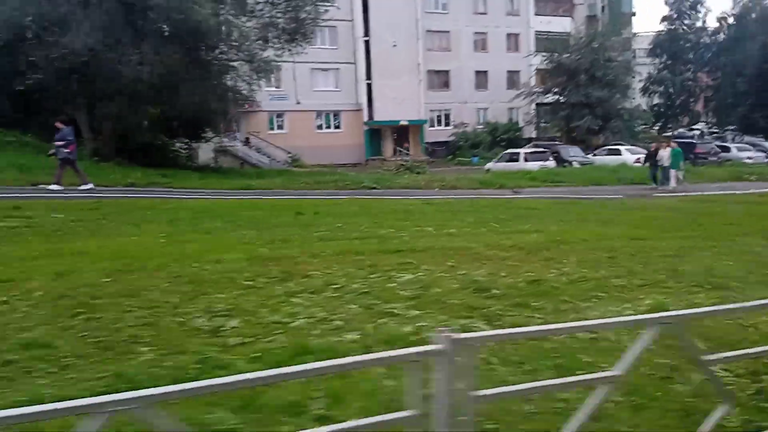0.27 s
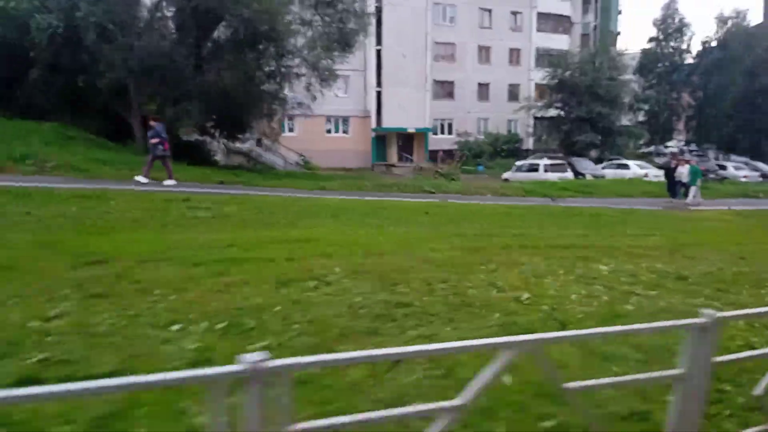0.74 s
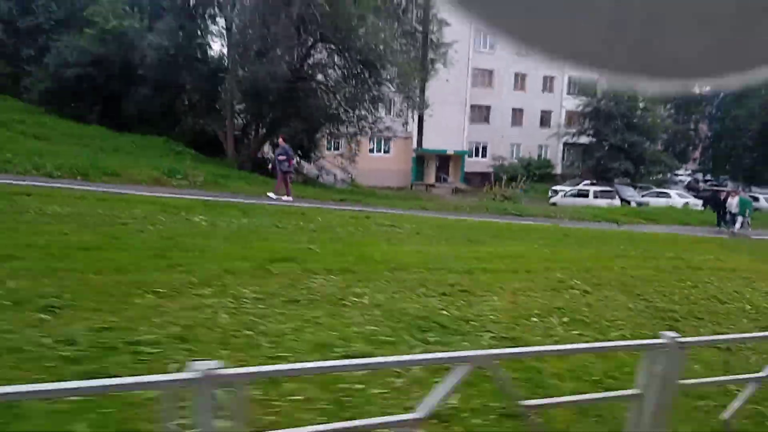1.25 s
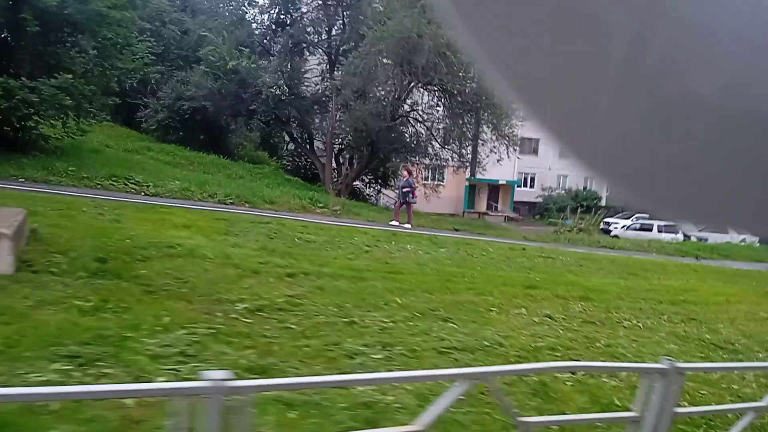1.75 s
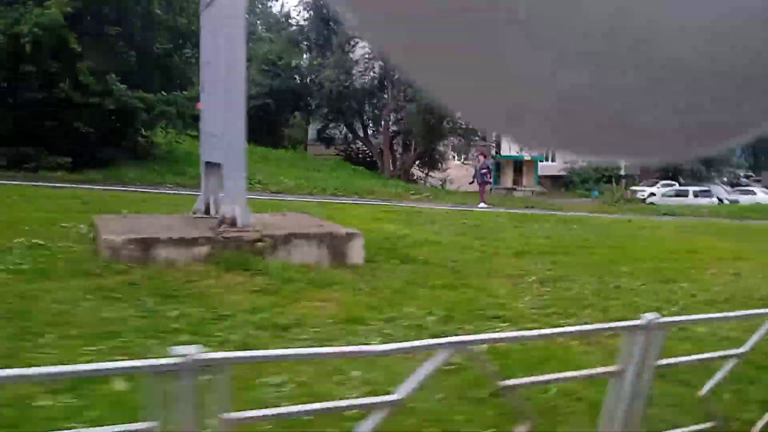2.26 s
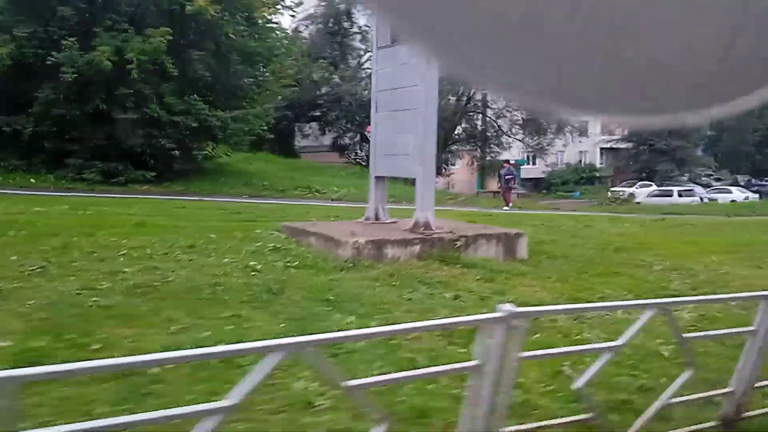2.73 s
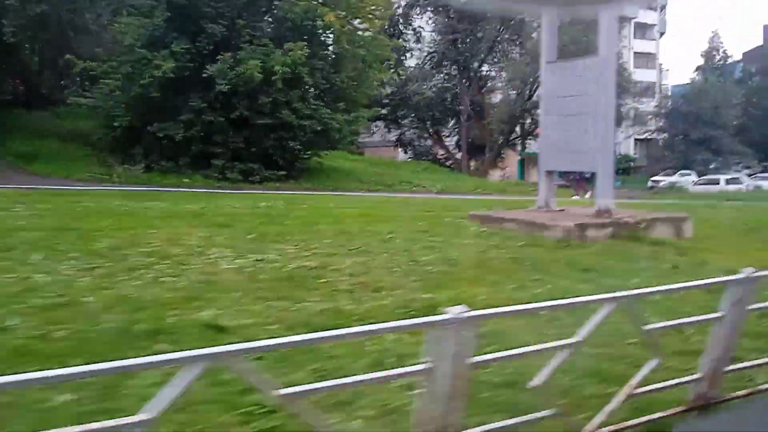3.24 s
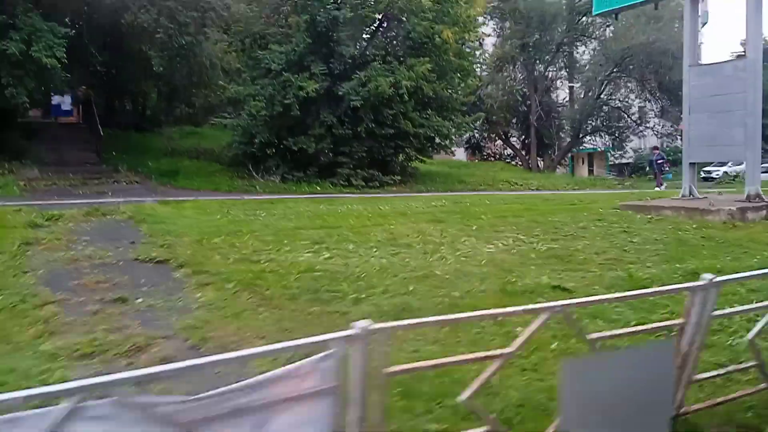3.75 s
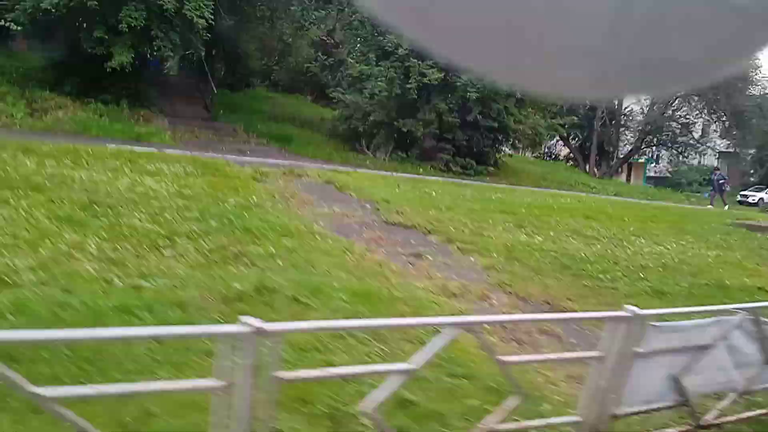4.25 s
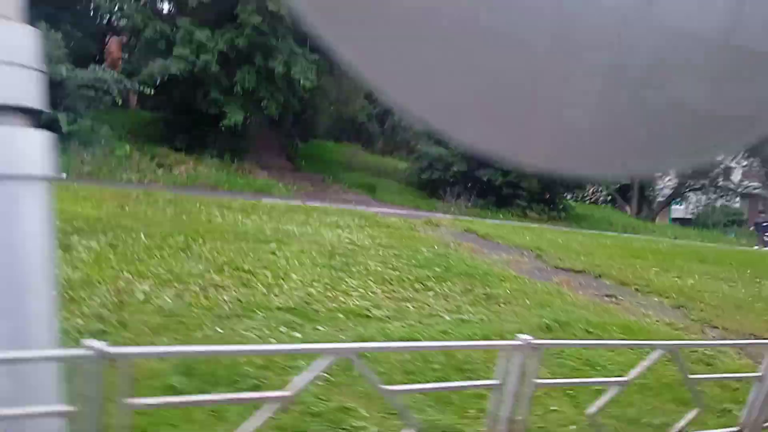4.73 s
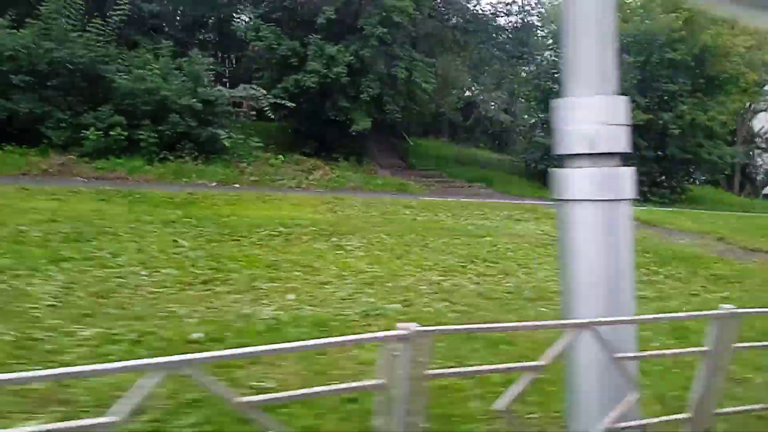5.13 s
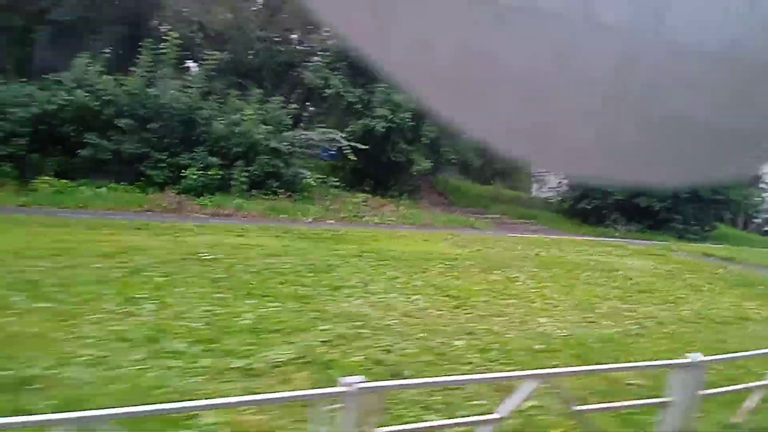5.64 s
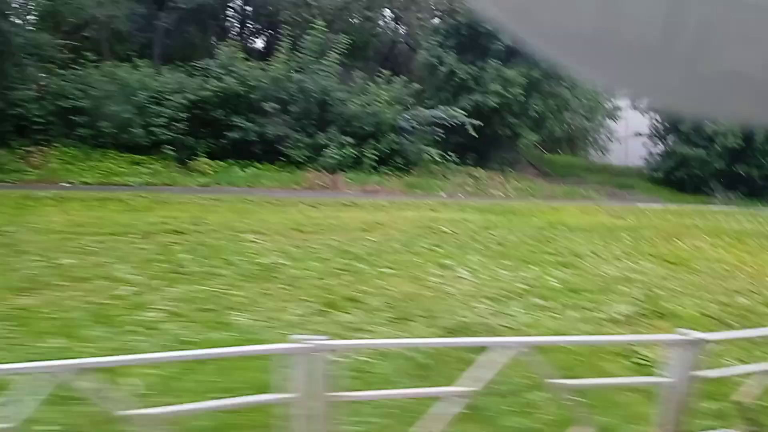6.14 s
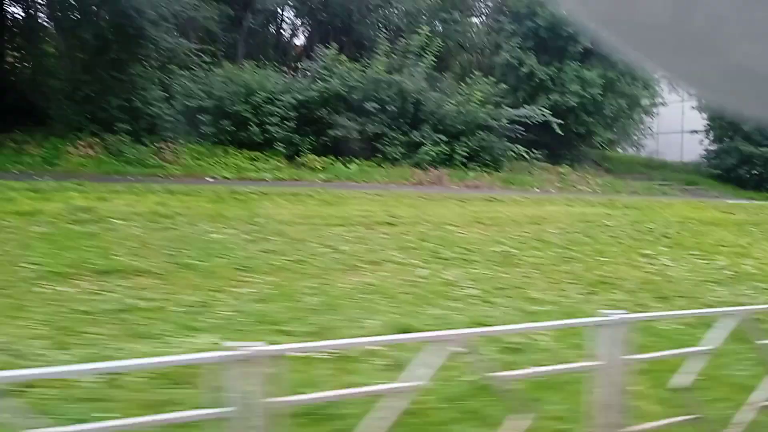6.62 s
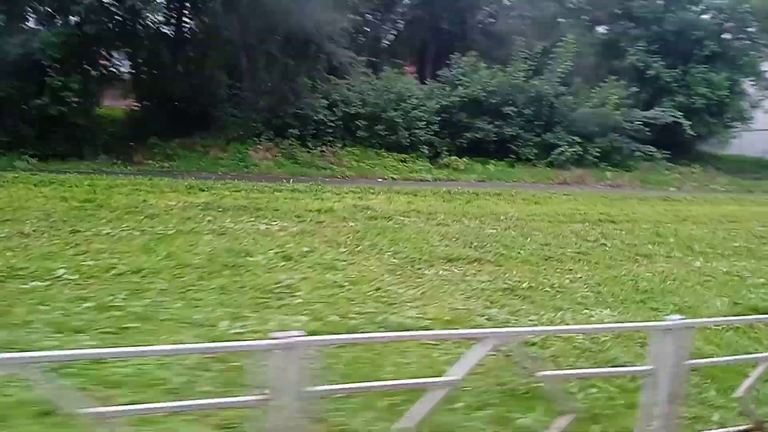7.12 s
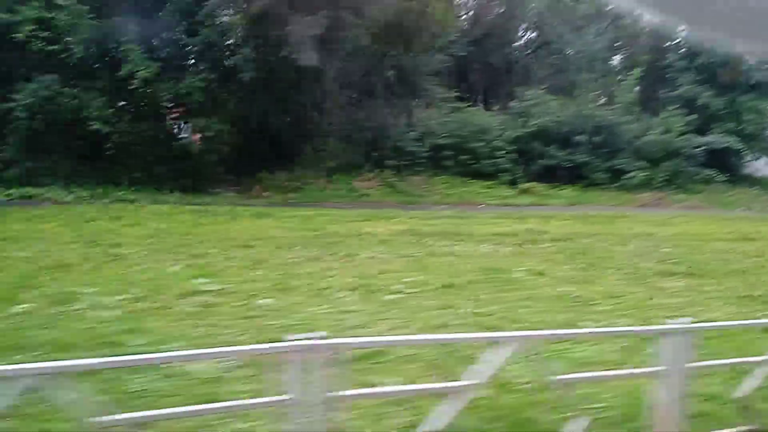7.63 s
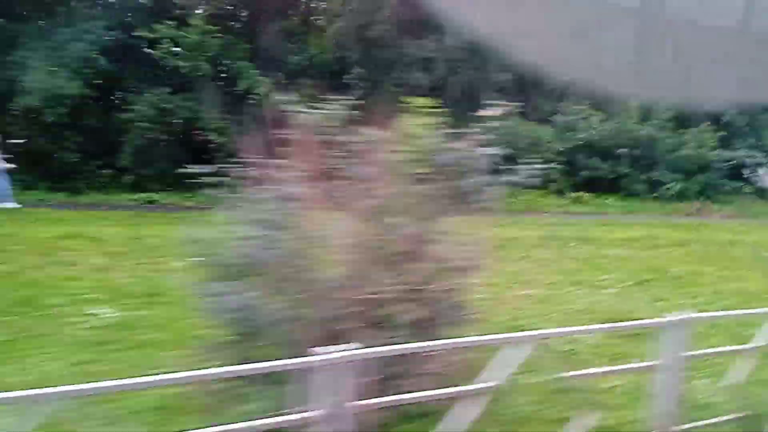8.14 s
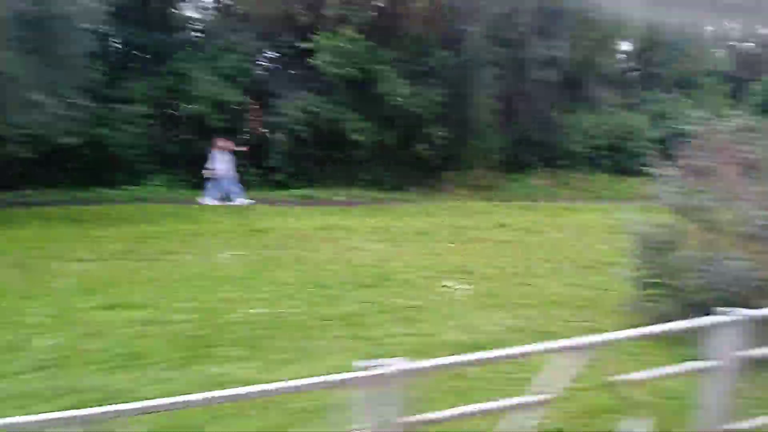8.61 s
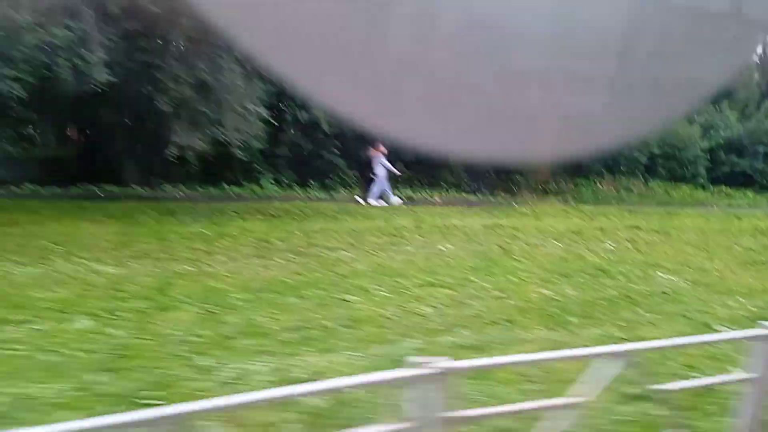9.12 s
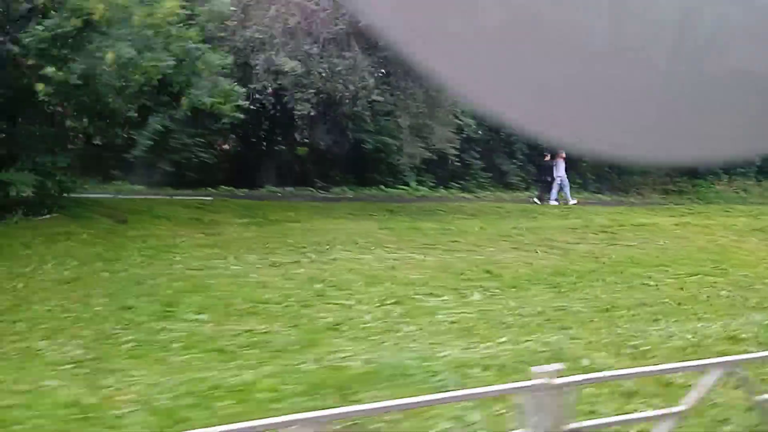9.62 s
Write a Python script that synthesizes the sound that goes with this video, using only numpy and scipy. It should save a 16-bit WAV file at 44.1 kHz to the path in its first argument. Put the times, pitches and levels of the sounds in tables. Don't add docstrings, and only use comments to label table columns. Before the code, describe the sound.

Loud bus engine drone climbs, falls away during a gear change, then labours upward again over road rumble, seat knocks and ticking trim.

```python
import sys
import numpy as np
from scipy import signal
from scipy.fft import rfft, irfft, next_fast_len
from scipy.io import wavfile
from scipy.ndimage import uniform_filter1d, map_coordinates

SR = 44100
rng = np.random.default_rng(int(sys.argv[2]) if len(sys.argv) > 2 else 0)


def wrap_up_sound(samples):
    columns = np.atleast_2d(samples).T
    tamed = np.clip(columns, -1, 1)
    steps = np.round(tamed * 32767).astype(np.int16)
    wavfile.write(sys.argv[1], SR, steps)


def amplitude_ratio(level_db):
    exponent = np.asarray(level_db, float) / 20
    return 10 ** exponent


N = 435266

# time in seconds, firing rate in Hz, throttle from 0 to 1, shake of the shell in dB.
DRIVE = [(0, 162, 0.9, -1), (.5, 168.3, 0.93, -0.5), (1.25, 178.3, 0.88, 0.5), (1.52, 179.8, 0.44, 0.5),
         (1.75, 165.4, 0, -2), (2.05, 144.9, 0.5, -3.5), (2.45, 127, 0, -7.5), (2.75, 109.1, 0, -9),
         (3.1, 92.7, 0, -12), (3.42, 83.2, 0, -11), (3.52, 84.5, 1, -8.5), (4.0, 88.38, 0.99, -8.5),
         (5.4, 94.15, 0.82, -8), (6.2, 96.68, 1, -7.5), (7.2, 99.18, 1, -7.5), (8.2, 103.5, 0.95, -6.5),
         (8.8, 106.8, 0.99, -6.5), (9.87, 109.7, 1, -6)]


def walk(rate):
    knots = rng.standard_normal(int(N / SR * rate) + 2)
    coarse = map_coordinates(knots, [np.arange(0, len(knots) - 1, 1 / 8)], order=3)
    return np.interp(np.arange(N) * (8 * rate / SR), np.arange(len(coarse)), coarse)


def curves(table):
    s, *columns = np.transpose(table)
    return [np.interp(np.arange(N) / SR, s, c) for c in columns]


def add(out, s, grain):
    i = int(s * SR)
    out[i:i + len(grain)] += grain[:len(out) - i]


def shape(points, size=N):
    hz, db = np.transpose(points)
    return np.interp(np.log(np.fft.rfftfreq(size, 1 / SR) + 1), np.log(hz), db)


def sweep(hz, modes):
    power = sum(amplitude_ratio(db) ** 2 / (1 + (2 * (hz - centre) / width) ** 2) ** 2 for centre, width, db in modes)
    return 10 * np.log10(power)


def engine():
    # multiple of the full engine cycle, dB at low revs, dB at high revs.
    uneven_orders = [(4, -8, 3), (5, -10, -2), (7, -8, -8), (9, -3, -8), (10, 1, -6), (11, -8, -5),
                     (13, -8, -4), (14, 1, -8), (16, -2, -6), (18, -6, -8), (20, -4, -6), (21, -7, -8),
                     (24, -9, -9), (27, -14, -12)]
    # Hz, width in Hz, tone level in dB at the centre.
    boom_modes = [(93.6, 5.9, -38), (98, 11, -48.5), (106.8, 6.9, -37), (164.5, 16.7, -21.5),
                  (179.3, 14, -29)]
    # Hz, width in Hz, dB.
    timing_modes = [(362, 5.1, -37.5), (380, 16.4, -39), (390.5, 8, -43.5), (402.2, 10.3, -39),
                    (413.1, 10, -48), (449.1, 22.5, -38.5), (461.5, 10, -49.5), (690, 11, -38),
                    (741, 21, -34), (754, 16, -42)]
    # Hz, width in Hz, dB.
    gearbox_modes = [(352, 24.7, -38), (372, 10, -36.5), (387, 7.5, -39)]
    # Hz, width in Hz, dB.
    upper_modes = [(432, 10, -46), (454.4, 12, -43.5), (466, 11, -41.5), (495, 8.8, -42), (512, 12, -43.5),
                   (528, 12, -39.5), (562, 13, -46.5), (595, 10, -39.5)]
    # Hz, width in Hz, dB.
    bank_modes = [(155, 65, -46.5), (219, 19, -32.5), (250, 30, -54)]
    upper_orders = (21, 24, 27)
    timing_order, gearbox_order = 34, 28.2

    hz, throttle, _ = curves(DRIVE)
    t, shut = np.arange(N) / SR, 1 - np.clip(throttle, 0, 1)
    cycle = 2 * np.pi * np.cumsum(hz) / SR / 8
    revs = np.clip((hz - 105) / 55, 0, 1)

    beat_db = 4.5 * np.cos(2 * np.pi * 7.2 * (t - 0.356))
    beat_db *= np.exp(-((t - 0.4) / 0.35) ** 2) * np.clip((t - 0.19) / 0.06, 0, 1)

    boom_db = sweep(hz, boom_modes) - 14.5 * shut + beat_db
    uneven_db = -47.5 - 12 * shut
    timing_shut_db = -26.5 * shut
    timing_db = sweep(hz * timing_order / 8, timing_modes) + timing_shut_db
    gearbox_db = sweep(hz * gearbox_order / 8, gearbox_modes)
    gearbox_db += np.interp(t, [6.05, 6.05 + 0.11], [-28.5, 0])

    def tone(order, db, waver_db=1.5, wander=0.3):
        level = np.sqrt(2) * amplitude_ratio(db + waver_db * walk(7))
        return level * np.sin(order * cycle + wander * walk(9) + 7 * rng.random())

    out = tone(8, boom_db, waver_db=1.2, wander=0.25)
    for order, low_db, high_db in uneven_orders:
        out += tone(order, uneven_db + low_db + revs * (high_db - low_db))
    out += tone(timing_order, timing_db, waver_db=2.6, wander=0.5)
    out += tone(2 * timing_order, timing_db - 13.5 - 8 * (1 - revs))
    out += tone(gearbox_order, gearbox_db, waver_db=4, wander=0.9)
    for order in upper_orders:
        out += tone(order, sweep(hz * order / 8, upper_modes) + timing_shut_db, waver_db=2.5)
    out += tone(12, sweep(hz * 12 / 8, bank_modes))
    return out, cycle * 8


def shake():
    shares = (0.33, 0.51, 1.01, 1.02)
    # time in seconds, rise of the rumble in dB.
    joints = [
        (0, 4),
        (1.54, 0),
        (2.75, -2.5),
        (3.7, 0),
        (4.78, 6.5),
        (5.28, 4),
        (5.75, 4),
        (6.7, 7),
        (7.5, 5.5),
        (8.9, 2),
    ]
    # time in seconds, half length in seconds, rise in dB.
    patches = [
        (1.6, .1, 1),
        (3.75, 0.11, 0.5),
        (4.25, 0.074, 2.5),
        (4.75, 0.091, 1),
        (5.35, .1, 1),
        (6.7, .15, 0),
        (7.5, .1, 1),
        (8.798, .12, 2.5),
        (9.05, .08, 0.5),
        (9.6, .15, 0.5),
    ]
    t, shake_db = np.arange(N) / SR, curves(DRIVE)[-1]
    levels = np.outer(shares, shake_db - np.median(shake_db))
    thumps_db = sum(db * np.exp(-((t - s) / 0.1) ** 2) for s, db in joints)
    levels[0] += thumps_db - 1.5
    levels[1:3] += 0.1 * thumps_db
    levels[2] += sum(db * np.exp(-((t - s) / half) ** 2) for s, half, db in patches)
    return levels


def rings(f, width_hz=22, depth_db=1.0):
    ripple = np.interp(f / width_hz, np.arange(1200), rng.standard_normal(1200))
    return depth_db * ripple * np.clip(np.minimum(6000 / f, f / 900), 0, 1)


def body(firing, gate=0.08):
    # Hz, dB per Hz.
    spectrum = [(20, -28.5), (50, -12), (86, -7.5), (174, .5), (315, -7.5), (447, -9), (707, -16),
                (850, -18.5), (1150, -23), (1550, -27.5), (2020, -26.5), (3560, -42.5), (6810, -49),
                (16000, -44.5)]
    # Hz, width in Hz, dB.
    panels = [(79.6, 8.9, 7), (110, 12, 1), (159, 28, 1.5), (205, 18, 0.5), (263, 30, 2), (350, 40, 0),
              (456, 28, 0.5), (517, 34, 2), (597, 53, 4), (696, 18, 6.5), (815, 40, -1), (980, 80, -0.5),
              (1240, 60, 1.5), (2050, 110, -0.5), (2760, 670, 2), (3226, 85, 4), (6280, 1800, 5)]
    layer_hz = (100, 450, 1700, 5000)
    size = next_fast_len(N)
    f = np.fft.rfftfreq(size, 1 / SR) + 1
    db = shape(spectrum, size=size)
    db += sum(gain / (1 + (2 * (f - hz) / width) ** 2) for hz, width, gain in panels)
    noise = rfft(rng.standard_normal(size)) * amplitude_ratio(db + rings(f))
    noise *= amplitude_ratio(-33) / np.std(irfft(noise, size))

    levels = shake()
    out, swell, rustle = np.zeros(N), walk(3), walk(40)
    for hz in 22 * 2 ** np.arange(0, 10, 0.5):
        window = np.cos(np.pi * np.clip(np.log2(f / hz), -0.5, 0.5)) ** 2
        band = irfft(noise * window, size)[:N]
        share = [np.interp(np.log(hz), np.log(layer_hz), row) for row in np.eye(4)]
        lumpy = np.clip(1900 / hz, 0.2, 1)
        flicker_db = lumpy * (0.5 * swell + 1.37 * walk(16) + 1.23 * walk(7))
        band *= amplitude_ratio(share @ levels + flicker_db + (hz > 9000) * 0.9 * rustle)
        out += band * (1 + gate * min(hz / 2500, 1) * np.cos(firing))
    return out


def singing():
    # start in seconds, length in seconds, pitch in Hz, width in Hz, level in dB.
    songs = [(0.3, 1.8, 459, 10, -45), (0.46, .7, 900, 10, -48.5), (0.05, .7, 1465, 24, -51),
             (1.5, 1.5, 13500, 60, -67), (1.26, .75, 248, 9.9, -38), (1.4, 0.09, 166, 16, -35),
             (4.64, 0.14, 1200, 67, -50.5), (1.5, 0.41, 600, 31, -56.5), (1, 0.24, 1300, 17, -58),
             (1.702, 0.72, 1244, 21, -53), (4, .08, 250, 17, -41), (7.86, 0.083, 215, 19, -39),
             (8, .25, 705, 12, -47), (8.5, .2, 680, 14, -46.5), (8.95, .35, 700, 12, -47),
             (1.7, .3, 600, 25, -45), (1.3, 0.065, 370, 30, -40), (5.38, 0.39, 334, 7, -43),
             (2.8, 3.7, 1246, 15, -56.5), (4.25, .16, 636, 14, -45), (5.6, .35, 2040, 25, -57),
             (5.5, 1.8, 2040, 50, -62.5), (6.496, 0.55, 80, 7.2, -41), (7.5, 0.49, 80, 3.8, -38.5),
             (8, 0.61, 1243, 18, -53.5), (8, 1.4, 909, 6.8, -57), (8, 1.6, 694, 14, -50),
             (8.5, .5, 82.5, 5.3, -40.5), (8.893, 0.88, 749, 6, -52.5), (9.298, 0.94, 927.6, 9.5, -59),
             (9.301, 0.6, 2050, 46, -58)]
    out = np.zeros(N)
    for s, length, hz, width, db in songs:
        t = np.arange(int(min(length, N / SR - s - 0.01) * SR)) / SR
        drive = rng.standard_normal(len(t) + SR // 4)
        ring = signal.lfilter(*signal.iirpeak(hz, hz / width, SR), drive)[-len(t):]
        swell = np.sin(np.pi * t / length) ** 0.34
        ends = np.clip(np.minimum(t, length - t) / 0.018, 0, 1)
        add(out, s, amplitude_ratio(db) * ring / np.std(ring) * swell * ends)
    return out


def squeaks():
    # start in seconds, length in seconds, pitch in Hz, even and odd partials in dB.
    slips = [(1.524, .02, 2040, -56, -80), (1.563, .04, 2055, -57, -80), (1.592, .024, 2075, -46, -64),
             (1.608, 0.027, 2085, -43, -37), (1.624, 0.032, 2097, -49, -45), (1.644, .03, 2085, -53, -53),
             (1.668, .028, 2075, -58, -70), (2.49, .024, 2045, -57, -94), (2.522, .035, 2060, -55, -89),
             (2.56, .034, 2043, -59, -82), (2.581, 0.11, 2041, -54, -87), (2.686, 0.03, 2050, -57, -52),
             (2.715, .023, 2070, -53, -42), (2.734, .018, 2060, -67, -53), (2.752, 0.03, 2050, -65, -61)]
    partials_db = (-6, 1.5, 1, -3, -9, -13, -22)
    # start in seconds, length in
    # seconds, Hz, dB.
    peeps = [(1.612, 0.034, 2103, -41), (1.62, .022, 10450, -43), (2.645, .02, 8170, -57),
             (2.72, .03, 10350, -56), (2.758, .02, 10350, -60), (5.392, 0.0048, 3590, -49.5),
             (1.524, .075, 8240, -54), (1.593, 0.067, 8280, -43), (1.594, .028, 12500, -49),
             (1.648, .03, 7960, -55), (2.519, 0.044, 8160, -55), (2.56, 0.032, 8170, -52),
             (2.596, .028, 8170, -51), (2.689, 0.011, 2060, -49), (2.718, .019, 2070, -50),
             (2.721, 0.021, 8240, -46), (5.385, .008, 5820, -57), (2.575, .075, 714, -41),
             (4.68, .026, 1190, -43), (5.115, .02, 1240, -46), (5.222, .024, 1200, -44),
             (5.292, .022, 1230, -46), (1.653, 0.011, 6100, -43), (1.666, 0.015, 6060, -40),
             (1.658, .022, 12100, -48), (1.65, .035, 14200, -62), (1.688, 0.026, 6078, -51),
             (1.705, .045, 6100, -61), (2.715, .03, 14450, -60), (2.65, .03, 10800, -66),
             (1.528, .06, 12350, -62), (3.053, 0.024, 5580, -69), (3.16, .022, 5550, -65),
             (3.58, 0.05, 15300, -66), (3.66, 0.059, 15050, -67), (3.71, .08, 13750, -68),
             (3.85, 0.045, 13430, -67), (3.985, .055, 5750, -69.5), (4.04, .06, 14400, -74),
             (4.066, 0.055, 11100, -53), (4.694, .033, 11200, -54), (4.688, .018, 11750, -58),
             (4.781, .011, 10700, -55), (5.307, 0.006, 5950, -55), (5.316, 0.006, 5950, -54),
             (5.389, .009, 8500, -56), (3.113, 0.12, 3950, -74)]
    out, jitter = np.zeros(N), 0.09 * walk(400) + 0.03 * walk(1600)
    flutter_db = [1.6 * walk(120) for _ in partials_db]
    for s, length, hz, even_db, odd_db in slips:
        t = np.arange(int(length * SR)) / SR
        span = slice(int(s * SR), int(s * SR) + len(t))
        phase = 2 * np.pi * hz * t + jitter[span]
        stack = np.zeros(len(t))
        for k, db in enumerate(partials_db):
            level_db = db + (odd_db, even_db)[k % 2] + flutter_db[k][span]
            stack += amplitude_ratio(level_db) * np.sin((k + 1) * phase)
        add(out, s, np.sqrt(2) * stack * np.sin(np.pi * t / length) ** 0.7)
    for s, length, hz, db in peeps:
        t = np.arange(int(length * SR)) / SR
        span = slice(int(s * SR), int(s * SR) + len(t))
        phase = 2 * np.pi * hz * t + min(hz / 1900, 3.2) * jitter[span]
        peep = amplitude_ratio(db + flutter_db[0][span]) * np.sin(phase)
        add(out, s, np.sqrt(2) * peep * np.sin(np.pi * t / length) ** 0.38)
    return out


def thuds():
    # time in seconds, peak in dB, colour in Hz.
    knocks = [(2.251, -27, 592), (2.583, -31, 713), (2.973, -30, 560), (3.207, -32, 708), (3.291, -33, 608),
              (3.473, -37, 606), (4.139, -30, 581), (4.456, -28, 595), (4.846, -30, 603), (5.675, -27, 538),
              (6.598, -32, 563), (9.787, -28, 700)]
    out, t = np.zeros(N), np.arange(SR // 5) / SR
    for s, db, hz in knocks:
        decay = 1000. ** (-t / 0.049)
        add(out, s, amplitude_ratio(db - 0.5) * np.sin(2 * np.pi * hz * t) * decay * np.minimum(t / 0.0014, 1))
    return out


def rattle(grit, hz, t60, sharp=4.5, broad=0.2):
    t = np.arange(len(grit)) / SR
    colour = signal.lfilter(*signal.iirpeak(min(hz, 16000), sharp, SR), grit)
    grain = 1 + np.abs(uniform_filter1d(grit[::-1], size=60)) * 3
    return (colour + broad * grit) * grain * 1000. ** (-t / t60) * np.minimum(t / 0.0005, 1)


def ticks():
    # time in seconds, peak in dB, colour in Hz.
    trim = [(2.688, -54, 5700), (2.705, -55, 5600), (2.692, -56, 12200), (2.56, -59, 12200),
            (2.722, -55, 14300), (2.718, -53, 9500), (2.725, -53.5, 6200), (2.865, -55, 7020),
            (2.905, -60, 7000), (3.031, -54.5, 7300), (3.113, -56, 7240), (3.15, -58, 7298),
            (4.05, -56, 7000), (4.197, -58, 14800), (4.25, -61, 3500), (4.655, -60, 12000),
            (4.69, -49, 15000), (4.762, -49.5, 6140), (4.757, -46, 11200), (4.806, -48, 10300),
            (4.812, -55, 6000), (4.738, -57, 7000), (5.336, -51.5, 15100), (5.39, -51, 15600),
            (4.91, -51, 10500), (4.963, -52.5, 10830), (5.013, -55, 10800), (5.23, -55, 9592),
            (5.484, -53.5, 10500), (5.54, -53, 10800)]
    out = np.zeros(N)
    for s, db, hz in trim:
        t60 = 0.21 * (hz / 7000) ** -1.7
        add(out, s, amplitude_ratio(db) * rattle(rng.standard_normal(SR // 5), hz, t60))
    return out


def latch():
    # time in seconds, peak in dB, brightness in dB per octave.
    knocks = [(4.7533, -37.5, -4), (4.762, -43, -1.5), (4.772, -45, -3.5), (5.297, -50, -9),
              (5.307, -48, 1), (5.336, -49, 0), (5.343, -49, -8), (5.3525, -48, -9), (5.388, -47, 3),
              (5.393, -40, -5), (5.438, -54, -8), (5.451, -49.5, -5)]
    # Hz, dB, t60 in seconds.
    parts = [(1300, -11, 0.04), (1850, -6, .05), (15000, -8, .04), (2320, 0, .05), (3500, 2, 0.06),
             (5860, -3.5, .09), (7200, -7, 0.1), (11500, -6, .05)]
    out = np.zeros(N)
    for s, db, bright_db in knocks:
        grit = rng.standard_normal(SR // 5)
        for hz, part_db, t60 in parts:
            level = amplitude_ratio(db + part_db + bright_db * np.log2(hz / 3500))
            add(out, s, level * rattle(grit, hz, t60, sharp=7.0, broad=0.06))
    return out


def cabin(x, t60=0.15, wet_db=-11):
    t = np.arange(SR // 4) / SR
    tail = rng.standard_normal(len(t)) * 1000. ** (-t / t60) * (t > 0.003)
    return x + amplitude_ratio(wet_db) * signal.fftconvolve(x, tail / np.sqrt(np.sum(tail ** 2)))[:N]


def scene():
    tones, firing = engine()
    small_noises = squeaks() + thuds() + ticks() + latch()
    return (tones + body(firing) + singing() + cabin(small_noises))[None]


def roll_off(x):
    return signal.sosfilt(signal.butter(12, 17090, fs=SR, output="sos"), x)


def record(dry):
    # Hz, dB.
    microphone = [(20, -8.5), (45, -7.5), (80, -0.5), (7300, -0.5), (8100, -10), (10000, -14.5),
                  (13600, -23), (14400, -16), (15500, -11.5)]
    longer = np.pad(dry, ((0, 0), (2048, 2048)), "reflect")
    size = next_fast_len(longer.shape[1])
    colour = amplitude_ratio(shape(microphone, size=size)) * (np.fft.rfftfreq(size, 1 / SR) < 15730)
    heard = irfft(rfft(longer, size) * colour, size)[:, 2048:2048 + N]
    heard *= np.minimum(np.arange(N)[::-1] / 300, 1)
    return roll_off(heard)


dry = scene()
out = record(dry)
wrap_up_sound(out)
```